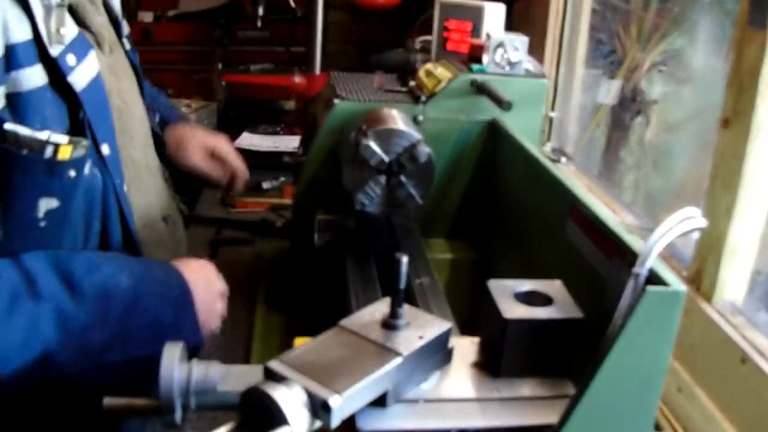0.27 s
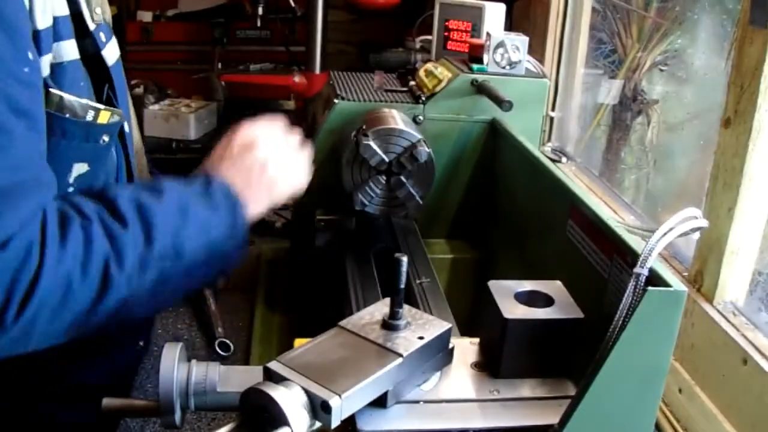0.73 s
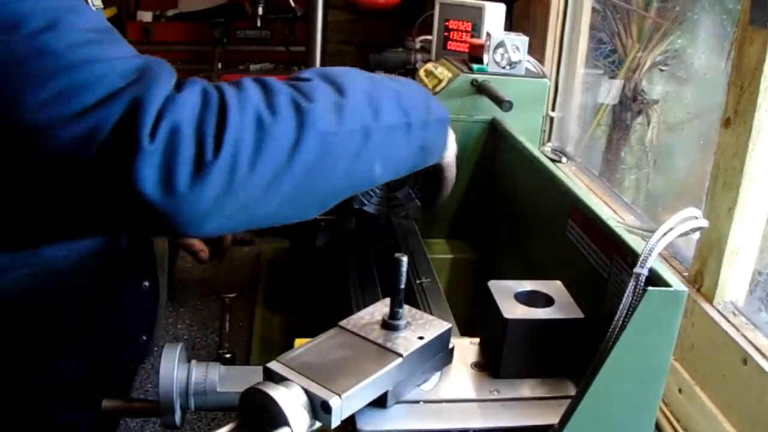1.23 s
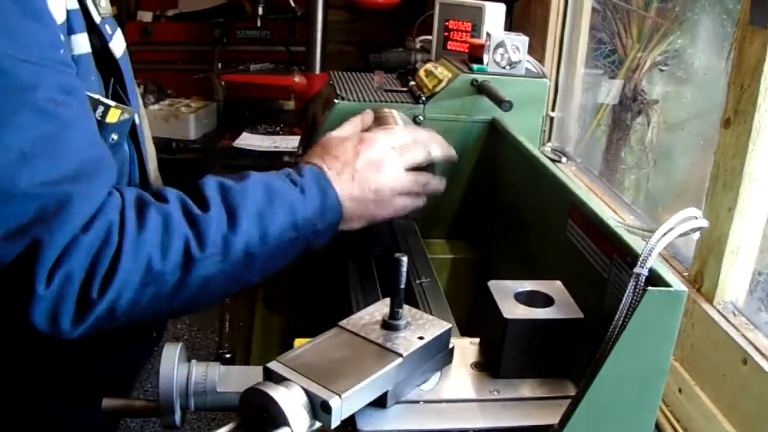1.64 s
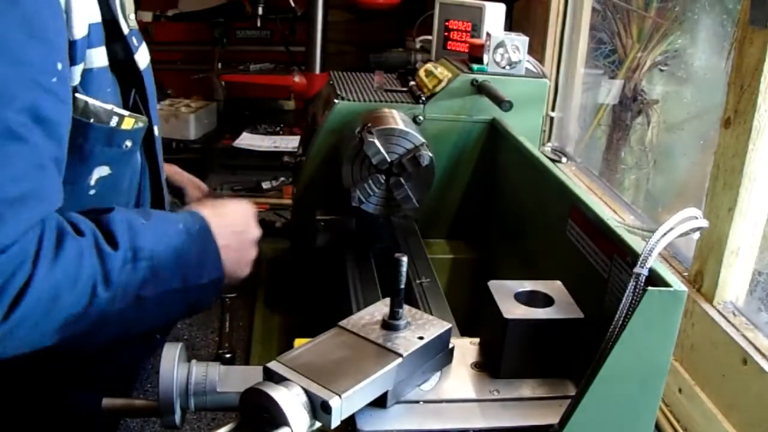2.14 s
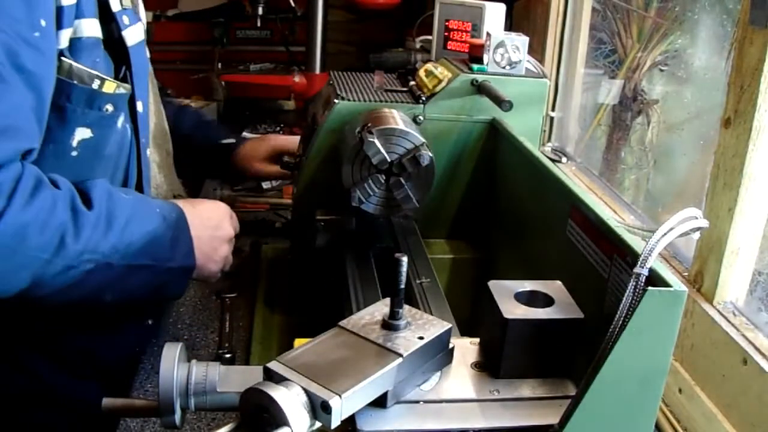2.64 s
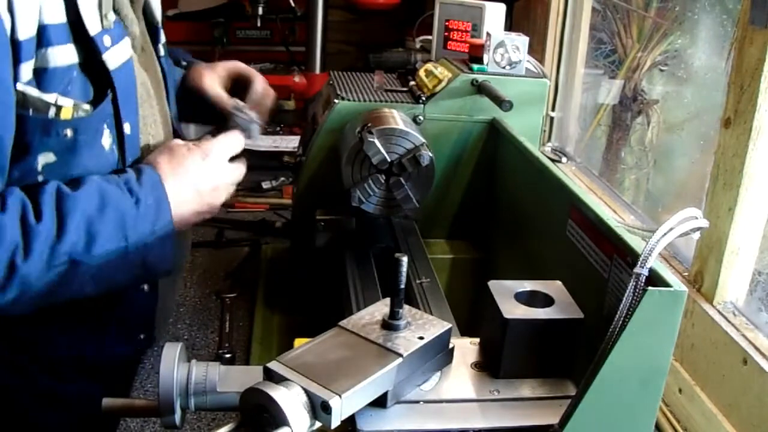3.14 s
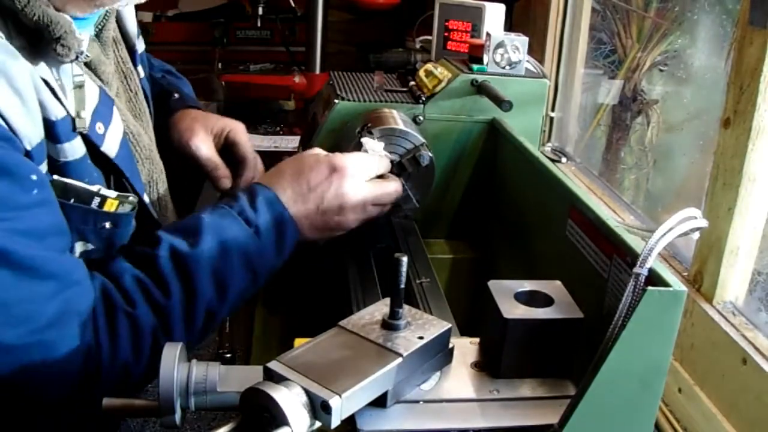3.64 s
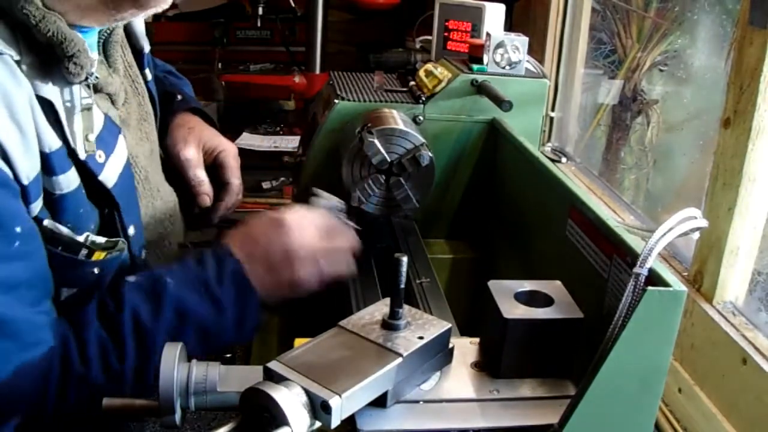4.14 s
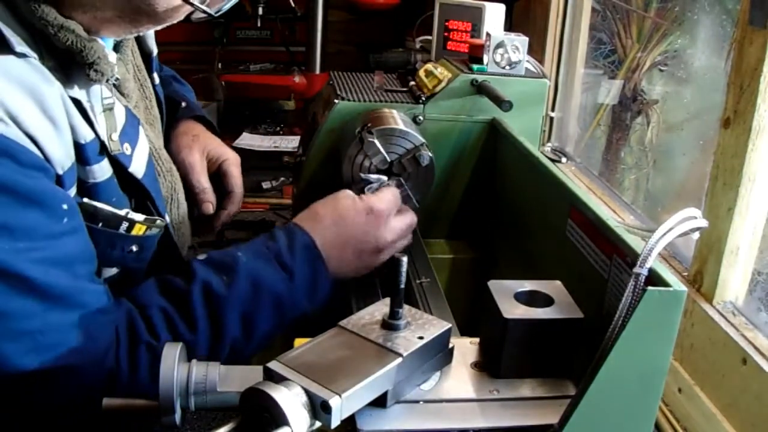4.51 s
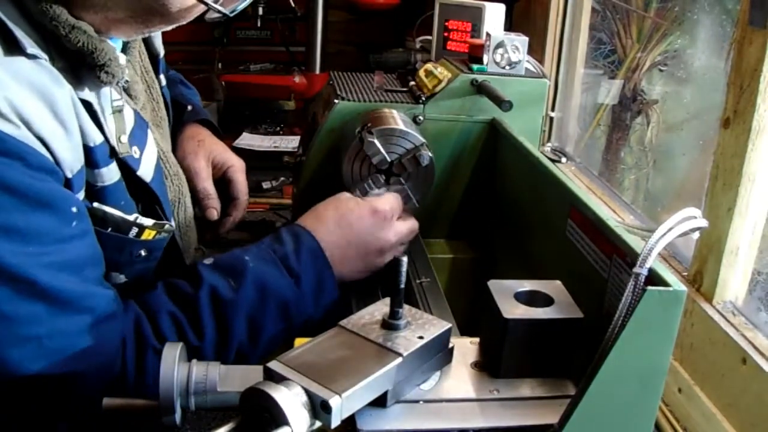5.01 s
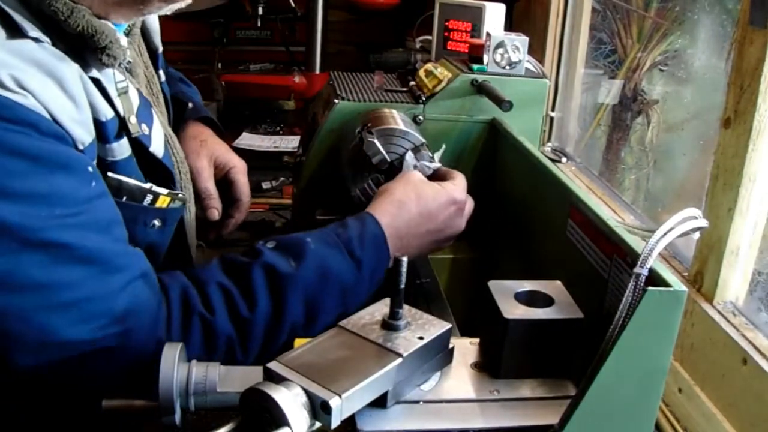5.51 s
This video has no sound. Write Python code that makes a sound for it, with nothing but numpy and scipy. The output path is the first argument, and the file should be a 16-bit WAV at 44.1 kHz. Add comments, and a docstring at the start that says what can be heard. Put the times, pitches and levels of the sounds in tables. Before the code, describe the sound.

In a small, dry workshop, a close microphone catches a faint scrape, then steel key clinks building to a very loud, bright clank on a lathe about one second in. After near quiet, a spanner clatters down hard at two and a half seconds. Soft bumps, sleeve rubs and faint rapid screw ticks follow over low rumble and hiss.

```python
"""Low rumble and a soft hiss of hands and cloth run throughout; a faint resonant scrape opens the scene.
A steel key clinks (decaying modes); tools clank on a lathe, rebound and slide: dull knock, bright crack.
A spanner clinks, soft bumps follow, then sleeves rub softly (noise strokes) and a screw ticks faintly.
Gain control ducks at the loud blows and creeps back, so the hiss sinks and slowly returns."""
import sys
import numpy as np
from scipy import signal
from scipy.fft import rfft, irfft
from scipy.io import wavfile
from scipy.ndimage import uniform_filter1d

SR = 44100
rng = np.random.default_rng(int(sys.argv[2]) if len(sys.argv) > 2 else 0)


def transcribe(u):
    """Save the signal u as a 16-bit wav file named by the first command-line argument.

    u: samples, shape (n,) or (channels, n), limited to [-1, 1]; the rate is SR.
    q: integer samples, one column per channel.
    """
    v = np.clip(np.atleast_2d(u).T, -1, 1)
    q = np.round(v * 32767).astype(np.int16)
    wavfile.write(sys.argv[1], SR, q)


N = 254456
TIME = np.arange(N) / SR
RING_SIZE = 20000  # samples for which a blow is heard
RING_TIME = TIME[:RING_SIZE]

# spectrum of the machine's dull knock: f/Hz, relative density/dB
KNOCK_SPECTRUM = [(40, -36), (120, -24.5), (250, -18.5), (420, -11), (620, 0.5), (1000, -4), (1400, -0.5),
                  (2000, -2.5), (3000, -8), (4500, -15), (7000, -35.5), (14000, -35.5)]
# spectrum of the bright steel crack: f/Hz, relative density/dB
CRACK_SPECTRUM = [(100, -29), (600, -11), (1500, -10.5), (2800, -2), (4500, 0.5), (6200, -1), (8200, 0),
                  (10200, 1), (12000, -12), (14500, -18.5)]
# spectrum of room rumble and recorder noise: f/Hz, relative density/dB
RUMBLE_SPECTRUM = [(10, -2.5), (30, -3), (50, -1.5), (100, -11.5), (220, -10), (400, -15), (1000, -30),
                   (4000, -56)]
# spells in which the screw turns: start/s, end/s, tick rate/(1/s), mean tick level/dB
SCREW_TURNS = [(5.045, 5.15, 30, -47), (5.277, 5.76, 29.8, -50)]


def amp(db):
    """Decibels to gain."""
    return 10 ** (np.asarray(db) / 20)


def unit(x):
    """Scales to an rms of 1."""
    return x / np.sqrt(np.mean(x ** 2) + 1e-20)


def read(points, hz):
    """Interpolates a table on a log-frequency axis."""
    f, value = np.transpose(points)
    return np.interp(np.log(hz + 1), np.log(f + 1), value)


def add(mix, s, sound):
    """Mixes a sound in at time s."""
    part = mix[max(round(s * SR), 0):][:len(sound)]
    part += sound[:len(part)]


def fade(t, t60):
    """Free exponential decay: -60 dB at t60."""
    return np.exp(-np.log(1000) * t / t60)


def stroke(start, end, rise_s, t60):
    """Envelope that rises, holds until the end and dies away."""
    return np.clip((TIME - start) / rise_s, 0, 1) * fade(np.maximum(TIME - end, 0), t60)


def since(chatter_s):
    """Time spent decaying: nothing dies away while steel still chatters on steel."""
    return np.maximum(RING_TIME - chatter_s, 0)


def noise(spectrum, size, tilt_db_per_octave=0):
    """Noise of rms 1 with the given spectrum, tilted over frequency."""
    hz = np.fft.rfftfreq(size, 1 / SR)
    gain = amp(read(spectrum, hz) + tilt_db_per_octave * np.log2(hz + 20))
    return unit(irfft(rfft(rng.standard_normal(size)) * gain, size))


def grain(depth_db, per_s):
    """Random gain, rms 1, of surfaces catching and letting go."""
    knots = rng.standard_normal(N)
    return unit(amp(depth_db * np.interp(TIME * per_s, np.arange(N), knots)))


def resonant(x, modes):
    """Passes x through a few resonances; rms 1."""
    hz = np.fft.rfftfreq(N, 1 / SR)
    body = sum(amp(db) / np.sqrt(width) / (1 + (2 * (hz - f) / width) ** 2) for f, width, db in modes)
    return unit(irfft(rfft(x) * body, N))


def ring(hz, db, t60, age):
    """Dying modes; each blow shares its energy among them a little differently."""
    gain = amp(db + 1.5 * rng.standard_normal(len(hz)))
    phase_turns = rng.random((len(hz), 1))
    waves = np.sin(2 * np.pi * (hz[:, None] * RING_TIME + phase_turns))
    return np.sqrt(2) * gain @ (waves * fade(age, t60[:, None])) / np.linalg.norm(gain)


def background(rumble_db=-63.5):
    """Low rumble of the room: steady shaped noise."""
    return amp(rumble_db) * noise(RUMBLE_SPECTRUM, N)


def hands(hiss_db=-50, steel_db=-10, touch_s=2.7, turning_db=-3):
    """Hiss of hands and cloth; it gains a metallic edge at the chuck and swells while the screw turns."""
    # f/Hz, relative density/dB
    hiss_spectrum = [(100, 4), (350, 1.5), (700, 3), (1500, -0.5), (3000, -1), (4200, -3.5), (6000, -4),
                     (9000, 0.5), (11000, -1), (13000, -6), (14500, -6)]
    # narrow resonances of rubbed steel: f/Hz, width/Hz, relative level/dB
    steel_modes = [(2120, 110, -6), (3070, 67, -1.5), (3580, 160, 3), (4420, 41, -4), (4580, 150, 3),
                   (4970, 160, -5), (7940, 80, 6), (10700, 1100, -4.5), (11060, 240, -9)]
    on_steel = np.clip((TIME - touch_s) / .2, 0, 1)
    steel = resonant(rng.standard_normal(N), steel_modes)
    hiss = noise(hiss_spectrum, N) + amp(steel_db) * on_steel * steel
    turning = sum(stroke(start, end, rise_s=0.25, t60=0.064) for start, end, _, _ in SCREW_TURNS)
    return amp(hiss_db) * (1 + amp(turning_db) * turning) * hiss * grain(depth_db=1.8, per_s=20)


def scrape(level_db=-46, end_s=.23):
    """Light friction sings in a few resonances."""
    # f/Hz, width/Hz, relative level/dB
    scrape_modes = [(580, 160, -11.5), (1312, 140, -8), (1750, 80, -7.5), (1845, 120, -3.5),
                    (1946, 800, .5), (2960, 400, -10.5), (3535, 36, -17), (8050, 200, -16)]
    friction = rng.standard_normal(N) * grain(depth_db=2.5, per_s=142.3)
    return amp(level_db) * stroke(0, end_s, rise_s=0.011, t60=.5) * resonant(friction, scrape_modes)


def rubs():
    """Hand and sleeve strokes of fine, slightly grainy friction that swell and fade evenly."""
    # f/Hz, relative density/dB
    rub_spectrum = [(100, -1), (500, -22), (1200, -11.5), (2500, -4), (4200, -2), (6000, -2), (8000, 0),
                    (10000, 4.5), (12000, -2.5), (14500, -15.5)]
    # peak t/s, peak level/dB, half length to 1/e power/s
    rub_strokes = [(1.845, -40, 0.0073), (3.46, -44, 0.15), (3.739, -42, 0.016), (3.842, -44, .035),
                   (3.92, -35.5, .006), (4.079, -33.5, .031), (4.37, -49.5, 0.066), (4.464, -40, 0.0084),
                   (4.694, -32, 0.016), (4.825, -47, 0.011), (4.898, -42.5, 0.0037), (4.986, -42, 0.0087),
                   (5.129, -38, 0.029), (5.765, -39, 0.018)]
    power = sum(amp(db) ** 2 * np.exp(-((TIME - s) / half_s) ** 2) for s, db, half_s in rub_strokes)
    return np.sqrt(power) * noise(rub_spectrum, N) * grain(depth_db=2.5, per_s=590)


def screw(tick_t60=0.06):
    """The turning screw slips in small, evenly timed steps of uneven strength that ring resonances."""
    # f/Hz, width/Hz, relative level/dB
    screw_modes = [(235, 29, -21), (392, 19, 5), (714, 49, -2), (1100, 330, -4), (2420, 2400, 6)]
    pushes = np.zeros(N)
    for start, end, per_s, db in SCREW_TURNS:
        sizes = amp(db + 2 * rng.standard_normal(size=64))
        for s, size in zip(np.arange(start, end, 1 / per_s), sizes):
            add(pushes, s, size * fade(RING_TIME, tick_t60))
    return pushes * resonant(rng.standard_normal(N), screw_modes)


def bumps(thud_t60=0.17, rise_s=0.0011):
    """A hand meets the machine: one damped note over a dull thud."""
    # f/Hz, relative density/dB
    thud_spectrum = [(100, -22), (250, -6), (420, 15), (700, 3.5), (1100, 2.5), (2200, -12), (5000, -39),
                     (14000, -50)]
    # t/s, note level/dB, f/Hz, note t60/s, thud level/dB
    bump_events = [(1.406, -39.5, 1254, 0.083, -42), (1.714, -37.5, 225, 0.18, -53),
                   (2.864, -47, 394, 0.18, -38), (2.88, -52, 1970, 0.49, -54),
                   (2.941, -47, 1976, 0.4, -37.5), (2.979, -42, 514, 0.22, -40),
                   (3.559, -33.5, 537, 0.089, -38.5), (4.1, -41, 1140, 0.05, -44),
                   (4.689, -49, 379, .18, -50), (4.992, -44.5, 384, 0.18, -47)]
    out = np.zeros(N)
    for s, note_db, hz, t60, thud_db in bump_events:
        note = amp(note_db) * np.sqrt(2) * np.sin(2 * np.pi * hz * RING_TIME) * fade(RING_TIME, t60)
        thud = amp(thud_db) * noise(thud_spectrum, RING_SIZE) * fade(RING_TIME, thud_t60)
        add(out, s, (note + thud) * (1 - np.exp(-RING_TIME / rise_s)))
    return out


def slide(slowing_db_per_s=45, hardness_db_per_octave=-1.0):
    """Gritty contact keeps the machine sounding between the blows, weakening as the tool slows."""
    # steel sliding on the machine: start/s, end/s, initial knock level/dB, initial steel level/dB
    slide_events = [(.83, 1.06, -25.5, -44), (1.115, 1.272, -9.5, -11), (2.484, 2.524, -13.5, -39),
                    (2.656, 2.695, -24, -17)]
    knock = noise(KNOCK_SPECTRUM, N, hardness_db_per_octave)
    steel = noise(CRACK_SPECTRUM, N)
    out = np.zeros(N)
    for start, end, knock_db, steel_db in slide_events:
        slowing = amp(-slowing_db_per_s * np.maximum(TIME - start, 0))
        contact = stroke(start, end, rise_s=.02, t60=.12) * slowing
        out += contact * (amp(knock_db) * knock + amp(steel_db) * steel)
    return out * grain(depth_db=3.5, per_s=250)


def tool(modes, place, length, age):
    """The place struck sets the balance of a tool's modes; a gripping hand shortens the ring."""
    hz, *levels, t60 = np.transpose(modes)
    db = np.array([np.interp(place, np.arange(len(row)), row) for row in np.transpose(levels)])
    return ring(hz, db, t60 * length, age)


def clinks(rows, modes, crack_db, crack_t60, caught_s, caught_t60=.14, rise_s=.0005,
           rough=.4, rough_per_s=700, rough_t60=.015):
    """A tool rings, roughly while it chatters, with a light crack; a hand catches it and stops the ring."""
    out = np.zeros(N)
    for s, db, place, length, chatter_s in rows:
        age = since(chatter_s)
        jolts = np.interp(RING_TIME * rough_per_s, np.arange(RING_SIZE), rng.standard_normal(RING_SIZE))
        roughness = 1 + rough * jolts * fade(age, rough_t60)
        held = fade(np.maximum(s + RING_TIME - caught_s, 0), caught_t60) if s < caught_s else 1
        rings = tool(modes, place, length, age) * roughness * held
        crack = amp(crack_db) * noise(CRACK_SPECTRUM, RING_SIZE) * fade(age, crack_t60)
        add(out, s, amp(db) * (rings + crack) * (1 - np.exp(-RING_TIME / rise_s)))
    return out


def spanner_clinks():
    """The spanner's bending steel rings in its own modes."""
    # f/Hz, relative level/dB struck at place 0, 1 and 2, t60 before the length factor/s
    spanner_modes = [(2783, -28, -24, -25, .34), (3420, -28, -24, -25, .3), (5632, -19, 0, -8, .56),
                     (6988, -26, -22, -11, .36), (7957, -30, -28, -22, .3), (9180, -22, -26, -24, .18),
                     (9478, 0, -10, -5, .4), (10218, -24, -28, 0, .32), (11350, -32, -35, -22, .3),
                     (13250, -36, -38, -26, .35), (14140, -25, -32, -24, .3)]
    # t/s, level/dB, place struck (0-2, more counts as 2), ring length factor, chatter/s
    spanner_events = [(1.27, -39, 0.72, 1.26, 0), (2.467, -28.5, 0.87, .9, .003),
                      (2.5721, -5.5, 0.33, .58, 0), (2.607, -11.5, 0.48, 0.87, 0.005),
                      (2.621, 2, .03, 0.32, 0.0053), (2.683, -16.5, 2.6, 0.57, 0.043),
                      (2.938, -31.5, 0, 0.53, 0.003)]
    return clinks(spanner_events, spanner_modes, crack_db=-13.5, crack_t60=0.089, caught_s=2.3)


def key_clinks():
    """The chuck key's steel rings in its own modes."""
    # f/Hz, relative level/dB struck at tip, middle and far end, t60 before the length factor/s
    key_modes = [(2665, -25, -21, -24, .22), (4385, -17, -8, -14, .3), (5561, -34, -15, -28, .32),
                 (6648, -12, -22, -24, .14), (6772, -7, -7, 0, .3), (9200, -13, -24, -24, .16),
                 (9482, -5, -13, -18, .18), (9540, -1, 0, -10, .24), (9979, -9, -20, -24, .14),
                 (10072, -1, -13, -16, .16), (10260, -8, -20, -22, .16), (10507, -22, -18, -7, .36),
                 (11460, -24, -30, -30, .18), (11805, -23, -28, -30, .18), (12288, -14, -16, -16, .22),
                 (12417, -15, -9, -6, .24), (13662, -32, -15, -11, .24), (14150, -21, -30, -30, .18)]
    # t/s, level/dB, place struck (0 tip, 1 middle, 2 or more far end), ring length factor, chatter/s
    key_events = [(.498, 5, 0.1, 0.037, 0.016), (.519, -17.5, 0, 0.24, .004), (.5775, -14, 0.2, 0.19, 0.01),
                  (.678, -30.5, 1.1, 0.15, 0.012), (.756, -14.5, 0.65, 0.44, .002),
                  (.772, -6, 1.24, 0.44, 0.017), (1.067, 0, 3.3, 0.61, 0.0075), (1.098, -1, 0.081, 0.34, 0),
                  (1.115, -1.5, 1.39, .9, 0), (1.203, -1.5, .15, 0.66, 0), (1.243, -10, 1.57, 0.67, 0.015)]
    return clinks(key_events, key_modes, crack_db=-15, crack_t60=0.021, caught_s=1.33)


def clanks(knock_t60=0.071, crack_t60=0.061, rise_s=0.00099, front_db=-1, front_t60=0.036,
           modes_db=-11, rebound_shrink=.85, rebound_loss_db=-4.5):
    """Each blow knocks the machine's dense modes and cracks brightly, then rebounds twice."""
    # clear modes of chuck, bed and sheet-metal tray: f/Hz, relative level/dB, t60/s
    machine_modes = [(440, -10, .14), (600, -6, .14), (840, -5, .15), (1043, 0, .22), (1220, -1, .14),
                     (1319, 0, .16), (1540, -4, .14), (1809, -1, .15), (1873, -1, .15), (1981, -6, .16),
                     (2519, -7, .15), (2917, -7, .16), (3500, -10, .16), (4214, -10, .16)]
    # heavy tool blows: t/s, knock level/dB, hardness as knock tilt/(dB/octave), crack level/dB,
    # chatter/s, time to first rebound/s, first rebound relative level/dB
    clank_events = [(0.7543, -8.5, -2, -14.5, 0.0094, .02, -9), (0.936, 0.5, -3, -19, 0, 0.044, -12.5),
                    (1.067, 9.5, 4.5, 12, 0.0019, 0.022, -17.5), (2.4524, -4, 4, -16.5, 0.0062, .018, -6.5),
                    (2.5723, 7.5, 3, -9, 0.00048, .03, -14.5), (2.606, -1.5, 1, 2, 0.0052, 0.045, -19.5)]
    out = np.zeros(N)
    # the first contact is the hardest
    front = (1 + amp(front_db) * fade(RING_TIME, front_t60)) * (1 - np.exp(-RING_TIME / rise_s))
    for s, knock_db, hardness, crack_db, chatter_s, gap_s, rebound_db in clank_events:
        age = since(chatter_s)
        # the second rebound comes sooner and weaker than the first
        second = (gap_s * (1 + rebound_shrink), rebound_db + rebound_loss_db)
        for delay_s, db in [(0, 0), (gap_s, rebound_db), second]:
            dense = noise(KNOCK_SPECTRUM, RING_SIZE, hardness) * fade(age, knock_t60)
            knock = dense + amp(modes_db) * ring(*np.transpose(machine_modes), age)
            crack = noise(CRACK_SPECTRUM, RING_SIZE) * fade(age, crack_t60)
            add(out, s + delay_s, amp(db) * front * (amp(knock_db) * knock + amp(crack_db) * crack))
    return out


def workshop(x, first_s=.005, taps_per_s=3000):
    """Sparse reflections from close walls and shelves; the treble dies first."""
    # f/Hz, t60/s
    room_t60 = [(100, .3), (500, .27), (2000, .21), (6000, .17), (14000, .13)]
    present = rng.random(RING_SIZE) < taps_per_s / SR
    taps = rng.choice([-1., 1.], RING_SIZE) * present * (RING_TIME > first_s)
    hz, t, z = signal.stft(taps, SR, nperseg=256)
    tail = signal.istft(z * fade(t, read(room_t60, hz)[:, None]), SR, nperseg=256)[1]
    return signal.fftconvolve(x, tail / np.linalg.norm(tail))[:N]


def scene(room_db=-9):
    """Tools and machine in the room, with the soft sounds of handling."""
    handling = hands() + scrape() + rubs() + screw() + bumps()
    direct = handling + slide() + spanner_clinks() + key_clinks() + clanks()
    return (direct + amp(room_db) * workshop(direct) + background())[None]


def gain_control(x, limit_db=-6, recover_db_per_s=5):
    """Turns the gain down at once when the power passes the limit, and lets it creep back."""
    power_db = 10 * np.log10(abs(uniform_filter1d((x ** 2).mean(0), size=220)) + 1e-12)
    recovered_db = recover_db_per_s * TIME
    excess_db = np.maximum(power_db - limit_db, 0)
    cut_db = np.maximum.accumulate(excess_db + recovered_db) - recovered_db
    return x * amp(-uniform_filter1d(cut_db, size=60))


def record(dry, self_noise_db=-64, ceiling=.97, edge_hz=14280):
    """Gain control, the recorder's own low noise and soft overload; then the band limit."""
    held = gain_control(dry) + amp(self_noise_db) * noise(RUMBLE_SPECTRUM, N)
    fine = signal.resample_poly(held, 2, 1, axis=1)  # oversampled against aliasing
    squeezed = signal.resample_poly(ceiling * np.tanh(fine / ceiling), 1, 2, axis=1)
    low_pass = signal.firwin(301, edge_hz, window=("kaiser", 9), fs=SR)
    return signal.oaconvolve(squeezed, low_pass[None], "same", axes=1)


dry = scene()
out = record(dry)
transcribe(out)
```